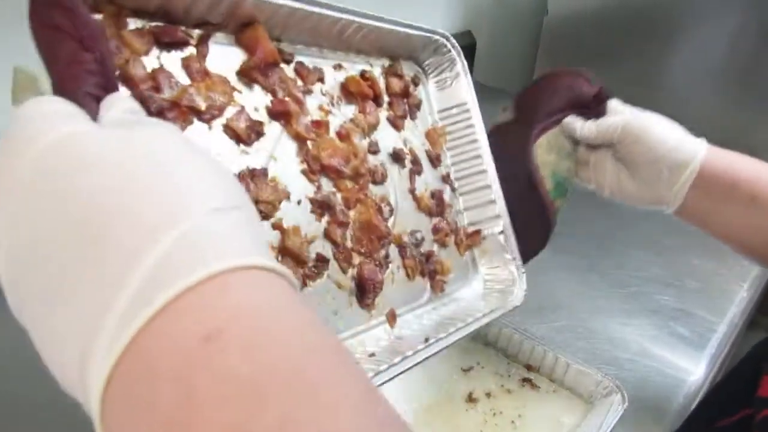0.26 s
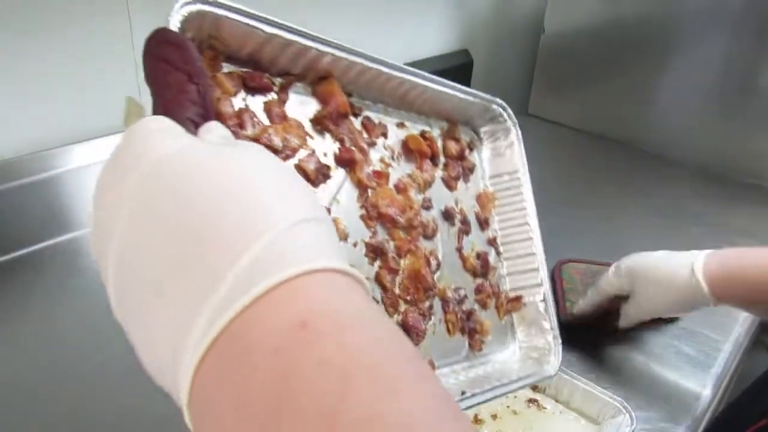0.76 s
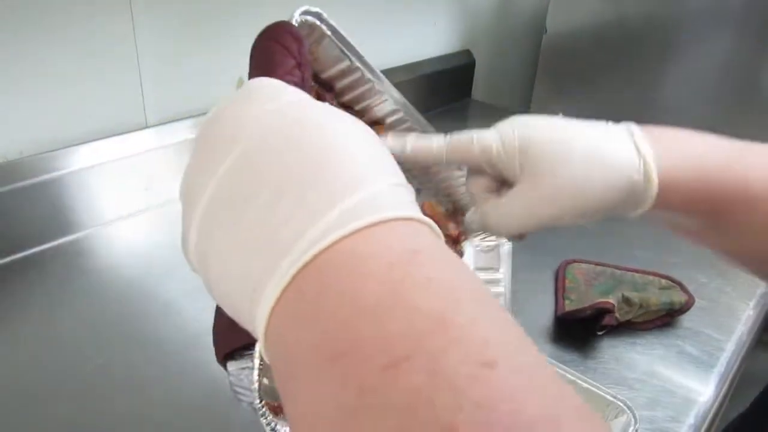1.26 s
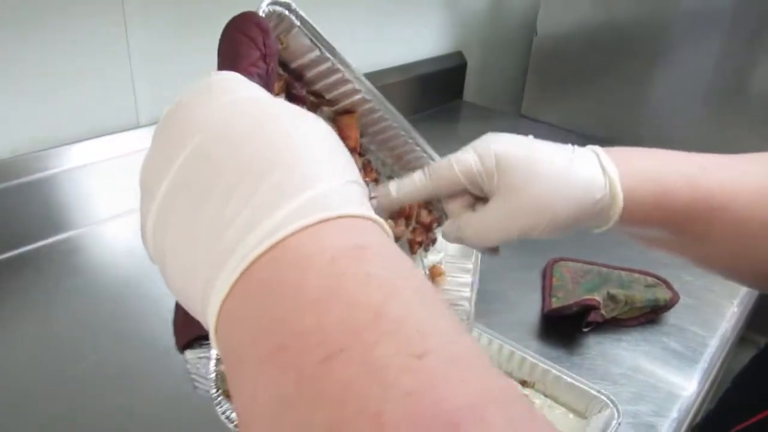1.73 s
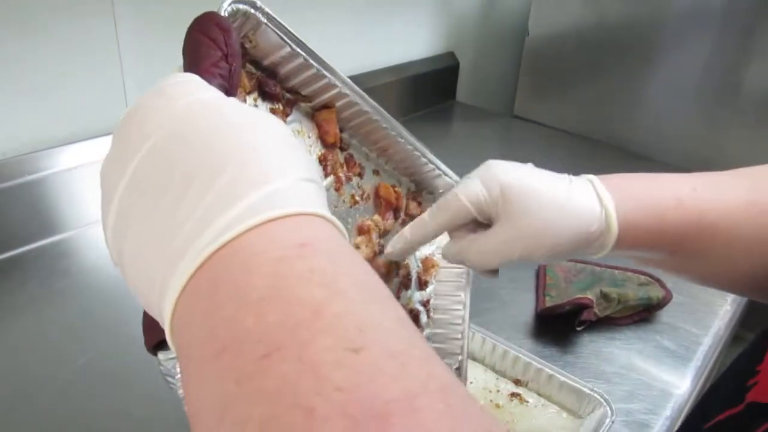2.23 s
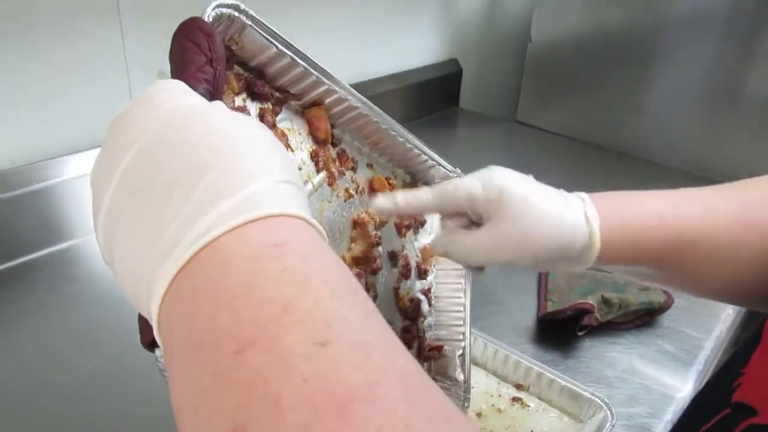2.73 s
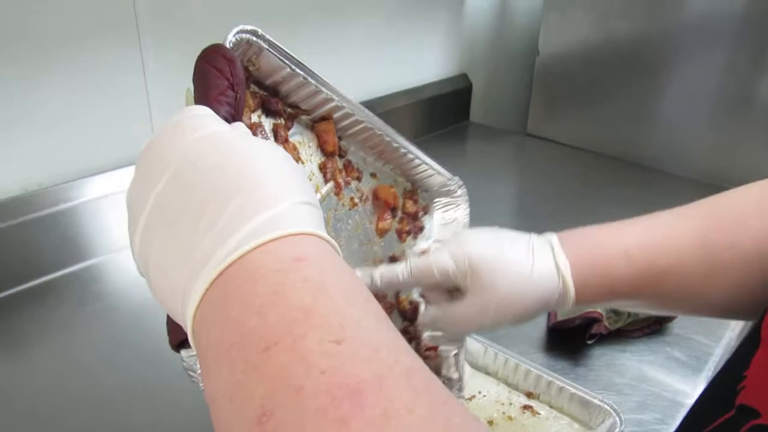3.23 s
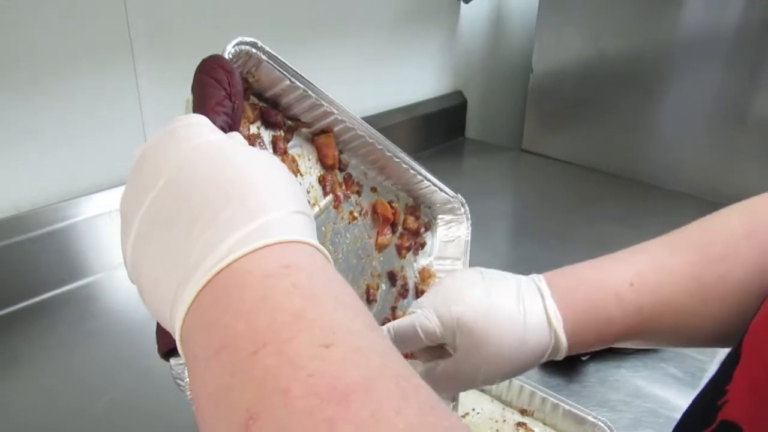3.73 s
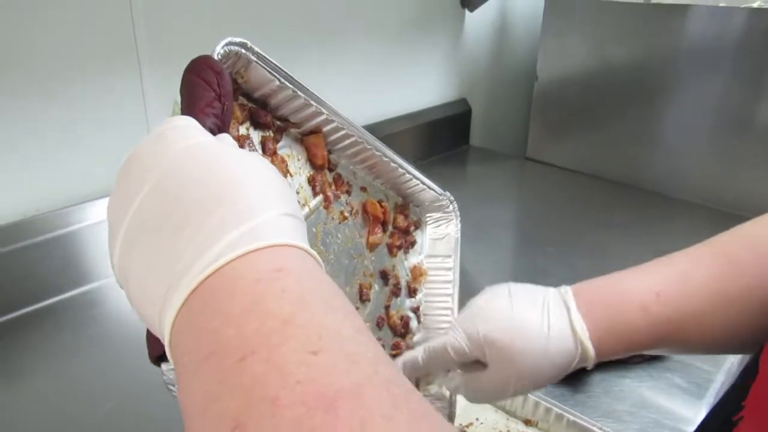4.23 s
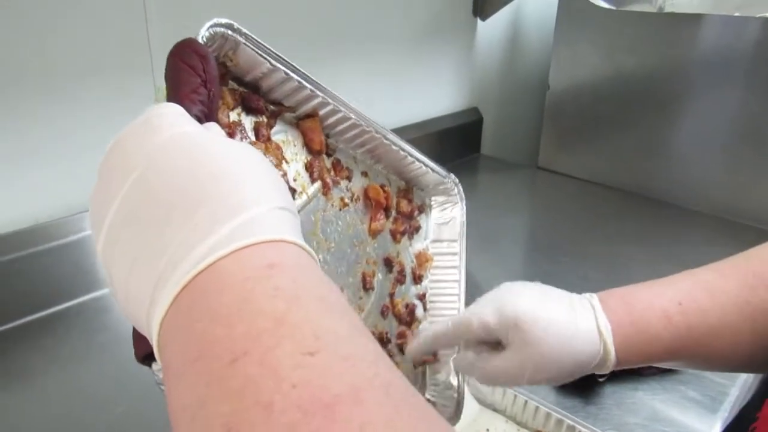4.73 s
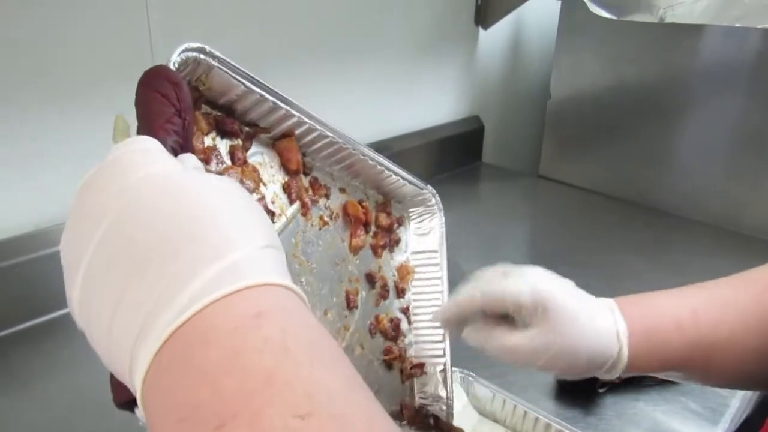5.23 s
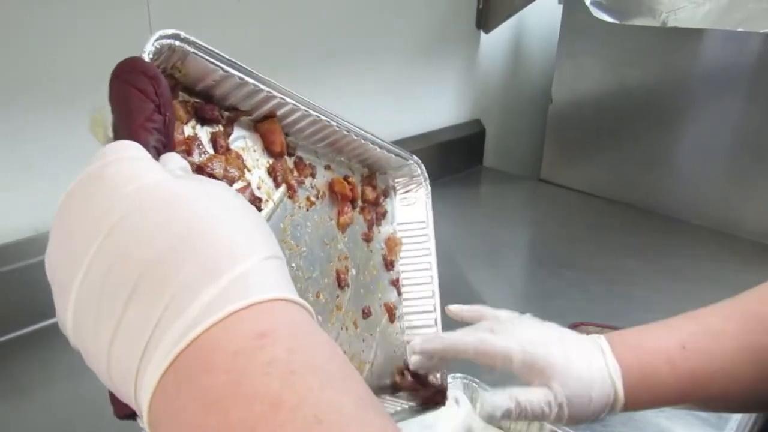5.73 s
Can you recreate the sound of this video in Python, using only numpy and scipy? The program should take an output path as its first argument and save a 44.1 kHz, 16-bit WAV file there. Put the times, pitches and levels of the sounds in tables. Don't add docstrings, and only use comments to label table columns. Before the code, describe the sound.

A thin foil pan pops, crackles and scrapes under a gloved finger while a low throbbing equipment hum fills a hard-walled kitchen.

```python
import sys
import numpy as np
from scipy import signal
from scipy.fft import rfft, irfft, next_fast_len
from scipy.io import wavfile

SR = 44100
rng = np.random.default_rng(int(sys.argv[2]) if len(sys.argv) > 2 else 0)


def magnitude_from_level(level_db):
    exponent = np.asarray(level_db, float) / 20
    return 10 ** exponent


def wav_out(sig):
    wavfile.write(sys.argv[1], SR, np.round(np.clip(np.atleast_2d(sig).T, -1, 1) * 32767).astype(np.int16))


N = 263718


def rms_one(x):
    return x / np.sqrt(np.mean(x ** 2) + 1e-20)


def at_hz(points, hz):
    points = np.array(points)
    return np.interp(np.log(hz + 1), np.log(points[:, 0] + 1), points[:, 1])


def in_time(rows):
    s, *columns = np.transpose(rows)
    return [np.interp(np.arange(N) / SR, s, c, left=c[0], right=c[-1]) for c in columns]


def drift(rate):
    r = np.exp(-80 * np.pi * rate / SR)
    noise = rng.standard_normal(N // 40 + 2002)
    slow = signal.lfilter([1], [1, -2 * r, r * r], noise)[2000:]
    return np.interp(np.arange(N) / 40, np.arange(len(slow)), rms_one(slow))


def resonate(x, hz, width_hz):
    r = np.exp(-np.pi * width_hz / SR)
    zeros = np.array([1, 0, -1]) * (1 - r * r) / 2
    poles = [1, -2 * r * np.cos(2 * np.pi * hz / SR), r * r]
    return signal.lfilter(zeros, poles, x + 1e-18)


def coloured(spectrum):
    hz = np.fft.rfftfreq(N, 1 / SR)
    inside = (hz > spectrum[0][0]) & (hz < spectrum[-1][0])
    white = rfft(rng.standard_normal(N))
    return rms_one(irfft(white * magnitude_from_level(at_hz(spectrum, hz)) * inside, N))


def grains(per_s, spread_db):
    sizes = magnitude_from_level(spread_db * np.minimum(rng.exponential(1, N), 4)) * rng.choice([-1, 1], N)
    return rms_one(sizes * (rng.random(N) < per_s / SR))


def kitchen(x, t60=0.63, wet_db=-16):
    t = np.arange(round(.6 * SR)) / SR
    tail = rng.standard_normal(len(t)) * magnitude_from_level(-60 * t / t60) * (t > .006)
    return x + magnitude_from_level(wet_db) * signal.fftconvolve(x, tail / np.sqrt(np.sum(tail ** 2)))[:N]


# centre in Hz, width in Hz, depth from 0 to 1.
DIP_BAND = (726.5, 110, 0.592)


def band_dip(x):
    hz, width_hz, depth = DIP_BAND
    return x - depth * resonate(x, hz, width_hz)


# frequency in Hz, level in dB per Hz.
RUMBLE = [(18, -48.5), (34, -25.5), (55, -15.5), (110, -8), (145, -15), (175, -11), (215, -9.5),
          (290, -9.5), (350, -13.5), (400, -13.5), (520, -23.5), (600, -24.5), (690, -37.5), (800, -27)]
# frequency in Hz, level in dB per Hz.
AIRFLOW = [(450, -72), (760, -1.5), (1010, 0), (1080, -2), (1270, -3.5), (1420, -4), (1780, -8),
           (2960, -16.5), (3110, -15), (3360, -20), (5880, -25), (12900, -26), (15000, -31)]
# frequency in Hz, width in Hz, level in dB rms.
ROOM_MODES = [(253, 20.7, -31), (230.2, 14.5, -44), (128.6, 12.3, -38), (499.4, 24, -49),
              (372.2, 35.9, -42.5), (425.2, 26, -47), (213, 16, -38.5)]
RUMBLE_DB, AIRFLOW_DB = -31, -41.5


def ventilation():
    out = magnitude_from_level(RUMBLE_DB) * coloured(RUMBLE)
    out += magnitude_from_level(AIRFLOW_DB + .5 * drift(12.9)) * coloured(AIRFLOW)
    for hz, width_hz, level_db in ROOM_MODES:
        once = resonate(rng.standard_normal(N), hz, width_hz)
        out += magnitude_from_level(level_db) * rms_one(resonate(once, hz, 2 * width_hz))
    return out


# frequency in Hz, level in dB rms, wander in dB, wander rate per second.
TONES = [
    (58.76, -47.5, 0.37, 0.97),
    (175.9, -40, -2.8, 1.6),
    (236, -26, 2.5, 1.5),
    (258.02, -34, -0.5, 2.13),
    (526.3, -52.5, 4, 3.82),
]
# time in seconds, level in dB.
COMPRESSOR = [(0.0, -29), (0.42, -26), (1.96, -28), (2.01, -19.5), (2.15, -33.5), (2.53, -22), (3.16, -31),
              (3.63, -23), (3.95, -36), (4.0, -26), (4.41, -22.5), (4.5, -34.5), (4.78, -23.5),
              (4.83, -35.5), (4.95, -20.5), (5.01, -30.5), (5.33, -23.5), (5.98, -32.5)]
# time in seconds, level in dB.
FAN_LOAD = [(0, -2), (.35, 4), (.6, -3), (.9, 5.5), (1.45, -1.5), (1.7, 5), (2.6, 0.5), (3.1, -4.5),
            (3.4, 0), (4.3, -6), (4.8, 1), (5.98, -2.13)]
MAINS_HZ, BLADE_HZ = 120.0, 128.25
MAINS_DB, BLADE_DB = -35.5, -29
BLADE_FOLLOWS = 0.39
BEAT_TOP_S = 0.3474


def motors():
    t, load_db = np.arange(N) / SR, in_time(FAN_LOAD)[0]
    out = magnitude_from_level(MAINS_DB + load_db) * np.cos(2 * np.pi * MAINS_HZ * (t - BEAT_TOP_S))
    out += magnitude_from_level(BLADE_DB + BLADE_FOLLOWS * load_db) * np.cos(2 * np.pi * BLADE_HZ * (t - BEAT_TOP_S))
    swell_db = in_time(COMPRESSOR)[0]
    for hz, level_db, wander_db, rate in TONES:
        wander = swell_db - swell_db.mean() if level_db > -30 else wander_db * drift(rate)
        phase = 2 * np.pi * (hz * t + rng.random()) + 0.139 * drift(rate)
        out += magnitude_from_level(level_db + wander) * np.cos(phase)
    return np.sqrt(2) * out


# time in seconds, centre in Hz, level in dB.
PAD = [(.2, 7000, -61.5), (.3, 6700, -60.5), (.5, 7300, -62), (.65, 7200, -63), (.8, 7000, -59),
       (.95, 6900, -63), (1.1, 6800, -77)]


def pad(width_hz=500, broad_db=3):
    hz, level_db = in_time(PAD)
    lowpass = signal.butter(2, width_hz, fs=SR, output="sos")
    wobble = signal.sosfilt(lowpass, rng.standard_normal(N))
    hiss = rms_one(wobble * np.cos(2 * np.pi * np.cumsum(hz) / SR))
    brushing = magnitude_from_level(broad_db) * rms_one(resonate(rng.standard_normal(N), 9500, 4100))
    return magnitude_from_level(level_db) * (hiss + brushing)


# start in seconds, peak in dB, frequency in Hz, t60 in seconds.
THUMPS = [(1.439, -26.5, 889.5, 0.05), (1.825, -28, 1643, 0.044), (2.032, -25.5, 471, 0.056),
          (2.033, -28.5, 912, 0.061), (2.117, -27, 1016, 0.055), (1.439, -31, 3723, 0.033),
          (1.825, -36.5, 3742, .04), (2.1755, -19, 2420, 0.038), (2.176, -21.5, 1620, 0.061),
          (2.178, -26.5, 1132, 0.108), (2.856, -36, 1830, 0.041), (3.39, -26.5, 1403, 0.051),
          (3.427, -25.5, 1312, 0.0728), (4.011, -31.5, 1782, .07), (4.324, -25.5, 1380, 0.043),
          (4.952, -21, 1800, 0.047), (4.954, -23, 900, 0.126), (5.676, -29, 2267, 0.11),
          (5.712, -28, 500, 0.058), (3.5, -44, 8000, .09), (3.502, -45, 5100, .07), (3.62, -38, 5200, .05),
          (4.011, -31, 3300, .04), (2.857, -32.5, 2800, .05), (5.107, -26, 2990, 0.057),
          (5.107, -28, 8060, .05), (5.108, -29, 4680, .05), (2.739, -27, 910, 0.044), (.04, -46, 6030, .1)]


def thumps():
    out, t = np.zeros(N), np.arange(SR // 5) / SR
    for s, level_db, hz, t60 in THUMPS:
        i = round(s * SR)
        rise = np.minimum(t / 0.00081, 1)
        out[i:i + len(t)] += magnitude_from_level(level_db - 60 * t / t60) * np.sin(2 * np.pi * hz * t) * rise
    return out * magnitude_from_level(1.8 * drift(130))


# start in seconds, strength in dB, crack over body in dB, t60 in seconds.
POPS = [(0.206, -29.5, -1.5, 0.023), (1.438, -30.5, -7, 0.047), (1.7798, -39, 9.5, 0.077),
        (1.824, -28.5, -11.5, 0.032), (2.032, -32.5, -1, 0.05), (2.116, -25.5, -2, 0.06),
        (2.174, -19, -18.5, 0.046), (2.4214, -28.5, -14, 0.049), (2.664, -36, -1, .043),
        (2.738, -26.5, -13, 0.0555), (2.8545, -27, -7.5, 0.107), (3.0637, -35.5, -3, 0.049),
        (3.3858, -30.5, -22, 0.079), (3.4256, -27, -10.5, 0.11), (3.5679, -31, -11, .06),
        (3.9814, -31, -2.5, 0.065), (4.0097, -24, -13, 0.057), (4.325, -32, -23, 0.0235),
        (4.9491, -21.5, -16, 0.092), (4.9927, -26.5, -9, 0.11), (5.105, -22.5, 7.5, 0.035),
        (5.588, -27, -1.5, 0.062), (5.6717, -33, 6.5, 0.1), (5.71, -25, -1, .081), (5.7529, -25, 3, 0.0275),
        (5.8333, -26, -3.5, 0.049), (5.841, -28, -15, .046)]
# start in seconds, strength in dB, crack
# over body in dB.
TICKS = [(.3894, -43, -1), (.7542, -40, -3), (1.7494, -43.5, 3), (2.6948, -31.5, -11),
         (3.8562, -32.5, -13.5), (4.2794, -41, 0.5), (4.5894, -52, 3.5), (4.6694, -45, -0.5),
         (4.7686, -44, 2), (4.9809, -35, 3), (5.5489, -37, -2), (5.954, -33, -8.5), (5.9, -36, -10),
         (1.7045, -44, -8)]
TICK_T60_S = 0.074
# level of one foil band in dB, low to high.
POP_COLOUR_DB = [-9.5, -12, -12, -6.5]
POP_CRACK_SHARE = [-0.15, -0.079, .55, 0.95]
RISE_S = [0.00407, 0.0017, 0.00036, 0.00016]


def pop_envelopes(hold_s=0.0024):
    out, t = np.zeros((4, N)), np.arange(SR // 4) / SR
    ticks = [(*tick, TICK_T60_S) for tick in TICKS]
    for s, level_db, crack_db, t60 in [*POPS, *ticks]:
        i = round(s * SR)
        for k, quick in enumerate([.8, .9, 1.1, 1.3]):
            fade_db = -60 * quick * np.maximum(t - hold_s, 0) / t60
            band_db = level_db + POP_COLOUR_DB[k] + POP_CRACK_SHARE[k] * crack_db
            snap = magnitude_from_level(band_db + fade_db) * np.minimum(t / RISE_S[k], 1)
            out[k, i:i + len(t)] += snap[:N - i]
    return out


# touch, hardest moment and lift in seconds, pressure in dB, dullness in dB.
STROKES = [(-.02, .06, 0.097, -47, -12), (1.721, 1.78, 1.778, -47, 2.5), (2.627, 2.664, 2.685, -43.5, 1),
           (2.717, 2.742, 2.89, -53, 8), (2.86, 2.958, 3.012, -41.5, -3), (3.281, 3.374, 3.42, -50, 8),
           (3.41, 3.432, 3.52, -46.5, 5), (3.48, 3.503, 3.6, -51, 7), (3.576, 3.64, 3.66, -42, 0),
           (3.847, 3.932, 3.96, -42.5, 2.5), (3.965, 4.0, 4.134, -44.5, -1),
           (4.04, 4.107, 4.18, -39.5, -4.5), (4.178, 4.25, 4.46, -56.5, 8), (4.578, 4.6, 4.63, -49.5, 2),
           (4.653, 4.673, 4.71, -51.5, 4.5), (4.946, 5.034, 5.14, -35.5, 3), (5.083, 5.141, 5.18, -43, 1.5),
           (5.153, 5.218, 5.29, -41, 1.5), (5.288, 5.332, 5.5, -53, 5), (5.544, 5.636, 5.76, -32.5, -2.5),
           (5.653, 5.711, 5.71, -27.5, -4), (5.711, 5.756, 5.82, -34.5, 1), (5.8, 5.813, 5.89, -38, 4),
           (5.895, 5.957, 6.1, -48, 13)]
# level of one foil band in dB, low to high.
STROKE_COLOUR_DB = [-9.5, -8, -7.5, -3]
STROKE_DULL_SHARE = [.8, 0.705, 0.334, 0.042]
LIGHT_TOUCH_DB, LETTING_GO_DB = 10.5, 11


def stroke_envelopes(edge_s=0.037):
    out = np.zeros((4, N))
    for touch_s, hardest_s, lift_s, level_db, dull_db in STROKES:
        first = max(round((touch_s - edge_s) * SR), 0)
        at = np.arange(first, min(round((lift_s + edge_s) * SR), N))
        t = at / SR
        touch = np.clip(np.minimum(t - touch_s, lift_s - t) / edge_s + .5, 0, 1)
        pressing_db = LIGHT_TOUCH_DB * ((t - hardest_s) / (hardest_s - touch_s)) ** 2
        lifting_db = LETTING_GO_DB * ((t - hardest_s) / (lift_s - hardest_s)) ** 2
        lost_db = np.where(t < hardest_s, pressing_db, lifting_db)
        for k in range(4):
            band_db = STROKE_COLOUR_DB[k] + STROKE_DULL_SHARE[k] * dull_db
            out[k, at] += touch * magnitude_from_level(level_db - lost_db + band_db)
    lumps_db = 1.96 * drift(48) + 1.7 * np.array([drift(26.3) for band in out])
    return out * magnitude_from_level(lumps_db)


# edge of a foil band in Hz; the bands are low body, middle, upper and bright.
FOIL_EDGES_HZ = [700, 1400, 3000, 6000, 15200]
# ring of the sheet in one band, as t60 in seconds.
FOIL_T60_S = [0.14, 0.108, 0.0254, 0.06]
FOIL_DULL_HZ = 9970


def foil(push, ringing_db=-5, patchy_db=1.7):
    out = np.zeros(N)
    for k, (low_hz, high_hz) in enumerate(zip(FOIL_EDGES_HZ, FOIL_EDGES_HZ[1:])):
        keep = magnitude_from_level(-120 / SR / FOIL_T60_S[k])
        stored = signal.lfilter([1 - keep], [1, -keep], push[k] ** 2 + 1e-18)
        ringing = magnitude_from_level(ringing_db) * np.sqrt(stored) * rng.standard_normal(N)
        rung = (push[k] + ringing) * np.sqrt(SR / 2 / (high_hz - low_hz))
        edges = np.geomspace(low_hz, high_hz, 4)
        for j in range(3):
            band = signal.butter(2, edges[j:j + 2], "band", fs=SR, output="sos")
            out += (-1) ** j * signal.sosfilt(band, rung * magnitude_from_level(patchy_db * drift(22)))
    return signal.sosfilt(signal.butter(1, FOIL_DULL_HZ, fs=SR, output="sos"), out)


def scene():
    snaps = np.array([grains(22000, 3.0) for band in range(4)])
    slips = np.array([grains(5000, 3.9) for band in range(4)])
    push = pop_envelopes() * snaps + stroke_envelopes() * slips
    mid = kitchen(foil(push) + thumps()) + pad() + motors() + ventilation()
    mid = band_dip(mid)
    return np.array([mid, mid])


# frequency in Hz, side minus mid in dB.
WIDTH = [(60, -1.5), (110, -10.5), (200, -15.5), (380, -13.5), (700, -10.5), (1290, -12.5), (2380, -21),
         (4400, -18.5), (8120, -6.5), (15000, -4)]
# frequency in Hz, left minus right in dB.
LEAN = [(60, .4), (110, 1.41), (200, 0.3), (380, -0.25), (700, -0.49), (1290, 0.33), (2380, 0.0),
        (4400, -0.12), (8120, -0.18), (15000, -2.5)]
# frequency in Hz, share that is a fixed phase lead from 0 to 1.
DIRECTED = [(50, .98), (300, .98), (600, .4), (2000, .5), (5000, .15), (12000, .1)]
TOP_HZ = 15080


def microphone_ports(field):
    size = next_fast_len(N + SR)
    hz, spectrum = np.fft.rfftfreq(size, 1 / SR), rfft(field, size)
    t = np.arange(SR // 3) / SR
    scatter = rng.standard_normal(len(t)) * magnitude_from_level(-60 * t / .3)
    scatter = rfft(scatter / np.sqrt(np.sum(scatter ** 2)), size)
    share = at_hz(DIRECTED, hz)
    side = magnitude_from_level(at_hz(WIDTH, hz)) * (1j * share + np.sqrt(1 - share ** 2) * scatter)
    lean = magnitude_from_level(at_hz(LEAN, hz) / 2)
    left_right = np.array([(1 + side) * lean, (1 - side) / lean])
    return irfft(spectrum * (hz < TOP_HZ) * left_right, size)[:, :N]


def top_cut(x):
    return signal.sosfilt(signal.butter(12, 15960, fs=SR, output="sos"), x)


def record(dry):
    mix = microphone_ports(dry[0])
    return top_cut(mix)


dry = scene()
out = record(dry)
wav_out(out)
```